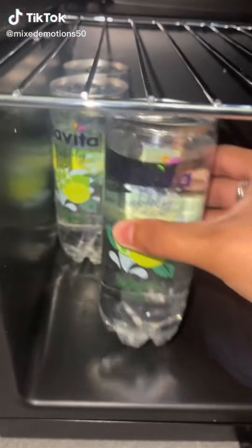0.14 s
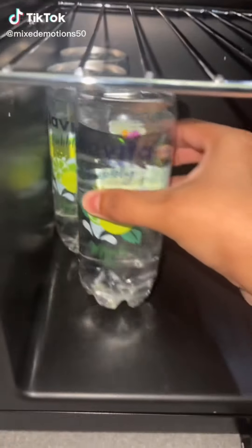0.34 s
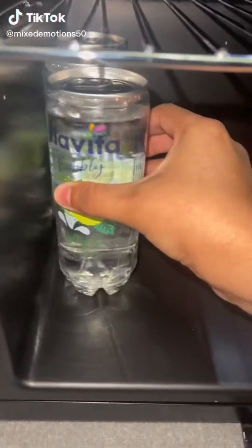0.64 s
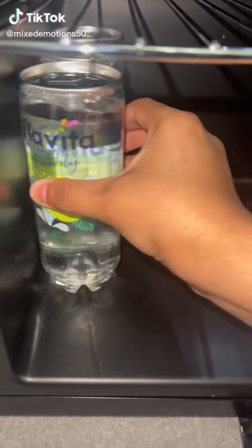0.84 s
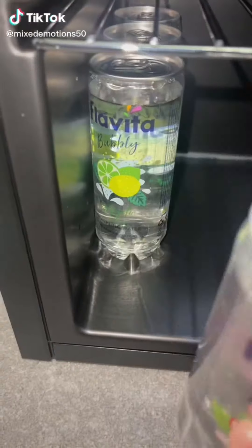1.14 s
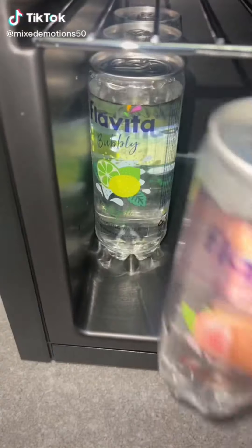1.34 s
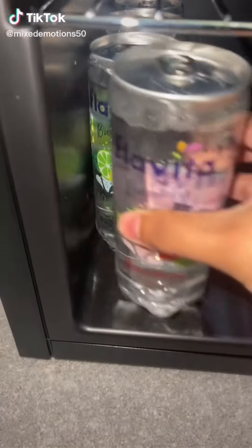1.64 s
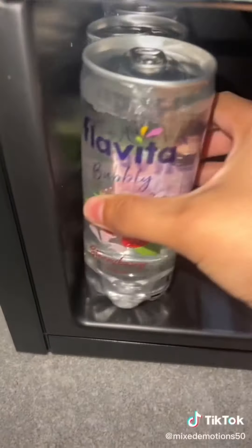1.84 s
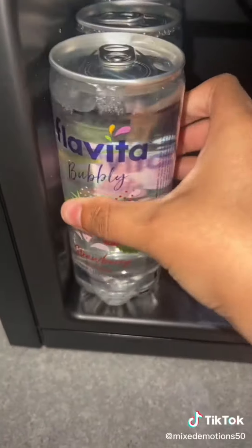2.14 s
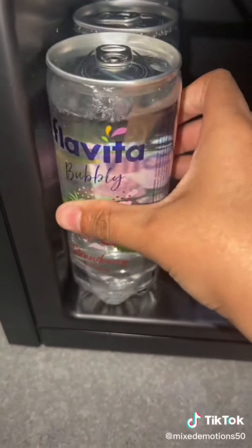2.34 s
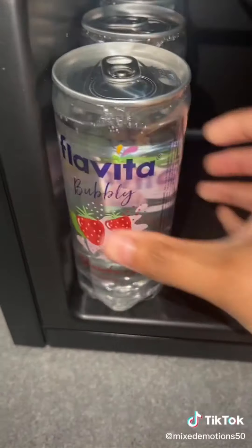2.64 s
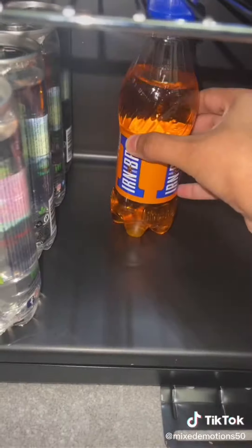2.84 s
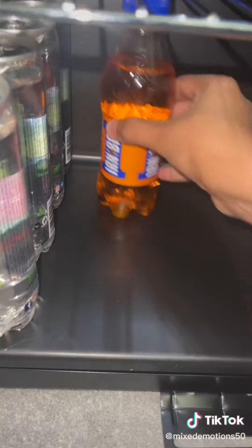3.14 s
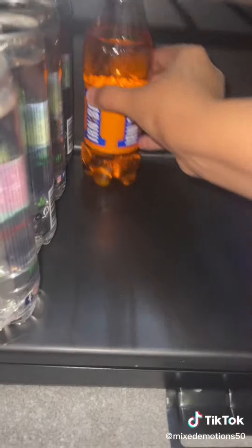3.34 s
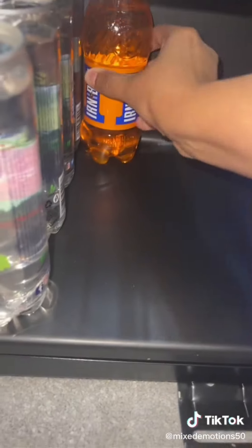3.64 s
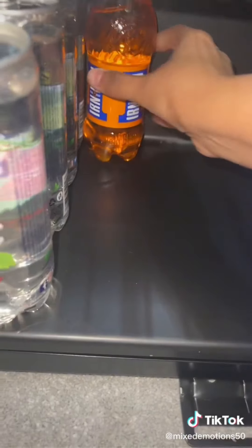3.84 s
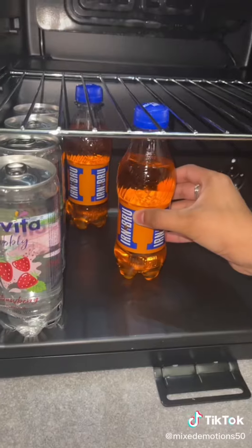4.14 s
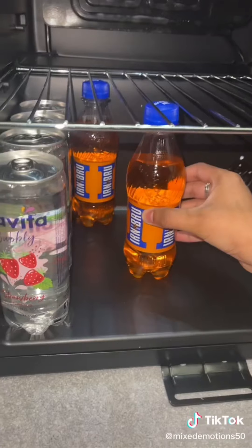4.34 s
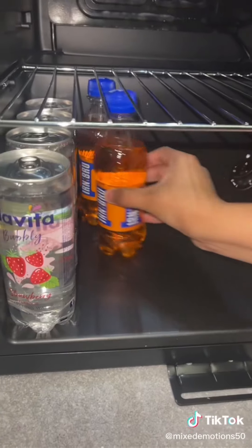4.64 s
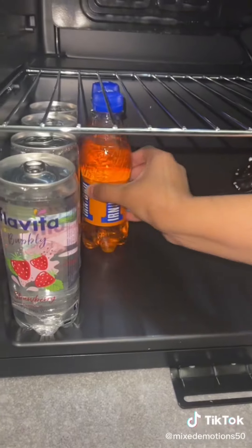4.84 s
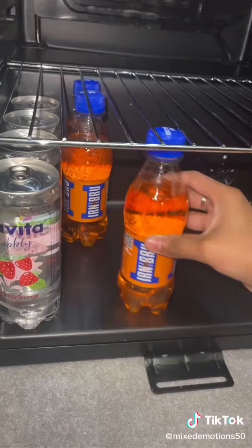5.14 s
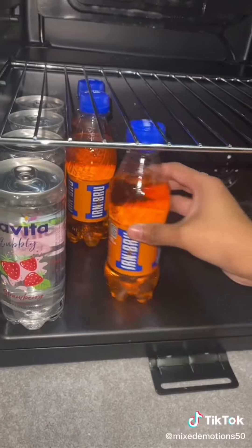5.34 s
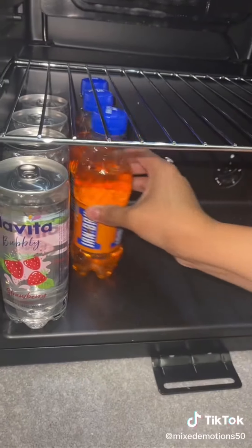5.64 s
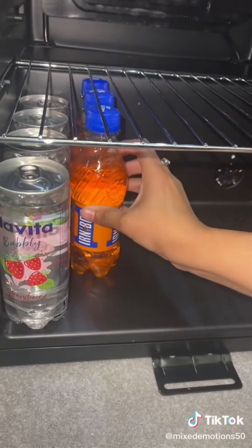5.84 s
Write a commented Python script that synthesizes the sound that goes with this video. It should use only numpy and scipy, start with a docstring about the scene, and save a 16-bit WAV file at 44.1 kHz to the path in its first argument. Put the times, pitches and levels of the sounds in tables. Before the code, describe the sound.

Full plastic drink bottles are set down one after another inside a small running fridge. Each lands with a quick cluster of hard taps and a hollow thump from the thin floor. Between the knocks, fingers softly crinkle the plastic, which gives small clacks and squeaks. A faint fan hiss, low rumble and compressor hum lie underneath. It is heard up close, in five short stretches split by brief silences.

```python
"""Inside a small running fridge, full plastic drink bottles are set down and slid along the thin floor. Each
hard bottle foot taps, the floor panel booms a moment later, and fingers crinkle the plastic, which also clacks
and squeaks. The fan hisses, the cabinet rumbles, the compressor whines, and a mains hum runs underneath. The
sound comes in five short stretches with silence between them."""
import sys
import numpy as np
from scipy import signal
from scipy.fft import rfft, irfft, next_fast_len
from scipy.io import wavfile
from scipy.ndimage import uniform_filter1d, map_coordinates

SR = 44100
rng = np.random.default_rng(int(sys.argv[2]) if len(sys.argv) > 2 else 0)


def unload_wav(signal):
    """Save mono or channel-first audio to the path in sys.argv[1] as 16-bit WAV at rate SR, clipped to [-1, 1]."""
    wavfile.write(
        sys.argv[1],
        SR,
        np.round(np.clip(np.atleast_2d(signal).T, -1, 1) * 32767).astype(np.int16),
    )


N = 264600

# When the sound is on: start_s, end_s, fade_in_s
STRETCHES = [(-1, .9465, .001), (1.134, 2.564, .001), (2.765, 3.766, .11), (3.972, 4.911, .14),
             (5.109, 7, .001)]
# Booms of the floor under a bottle: start_s, level_db, pitch_hz, ring_s (time to fall by 60 dB)
FLOOR_BOOMS = [(0.248, -36, 184, 0.053), (0.267, -25, 198, .08), (0.289, -25.5, 143, 0.017),
               (0.299, -27.5, 70, 0.17), (0.334, -18.5, 164.5, 0.062), (0.358, -25, 144.4, 0.12),
               (0.43, -36.5, 212.6, 0.14), (0.707, -28, 201, 0.03), (0.728, -27, 161.6, 0.043),
               (0.745, -29.5, 82, 0.21), (0.928, -35, 129.4, 0.094), (1.563, -36.5, 109, 0.046),
               (1.585, -31.5, 113, 0.028), (1.7284, -21, 172.4, 0.071), (1.761, -23, 174, 0.1),
               (1.778, -24, 145, 0.065), (1.801, -20.5, 229, .05), (1.853, -36.5, 220.6, 0.24),
               (2.266, -37, 237, 0.044), (2.283, -35, 124, 0.056), (2.309, -37, 151, 0.05),
               (2.391, -32, 83.7, 0.21), (2.489, -46, 100.5, 0.097), (2.537, -34.5, 77.6, 0.074),
               (3.243, -28, 167, 0.049), (3.26, -27.5, 175, 0.053), (3.2969, -20, 134, 0.021),
               (3.328, -36, 155, 0.2), (3.359, -24, 78, 0.018), (3.625, -33, 92, 0.042),
               (4.175, -45.5, 166.7, 0.24), (4.366, -34, 148, 0.087), (4.608, -30, 143, 0.08),
               (4.636, -34, 168, 0.023), (4.651, -21.5, 151, 0.061), (4.657, -19.5, 160, 0.015),
               (4.692, -28, 140.8, 0.088), (4.705, -31, 63, 0.17), (5.154, -42, 150, 0.035),
               (5.375, -47, 167, 0.041), (5.467, -36.5, 203, 0.18), (5.494, -27, 133, 0.088),
               (5.508, -45, 66, .12), (5.572, -38, 91, .052)]


def amp(db):
    """Turns decibels into a gain to multiply by."""
    return 10 ** (np.asarray(db) / 20)


def unit(x):
    """Scales a signal to an average strength (rms) of 1."""
    return x / np.sqrt(np.mean(x ** 2) + 1e-20)


def wobble(rate, size=N):
    """A smooth curve through `rate` random values a second."""
    points = rng.standard_normal(int(size * rate / SR) + 4)
    return map_coordinates(points, [np.arange(size) * rate / SR])


def filtered(x, response):
    """Multiplies each frequency in x by the gain response(hz)."""
    size = next_fast_len(len(x) + 8192)
    return irfft(rfft(x, size) * response(np.fft.rfftfreq(size, 1 / SR)), size)[:len(x)]


def noise(spectrum, size=N):
    """Noise of strength 1, shaped by (pitch_hz, level_db) points."""
    pitch_hz, level_db = np.transpose(spectrum)
    shape = lambda hz: amp(np.interp(np.log(hz + 1), np.log(pitch_hz), level_db))
    return unit(filtered(rng.standard_normal(size), shape))


def fade(t, ring_s, rise_s):
    """A soft rise and a fall of 60 dB every ring_s seconds."""
    return amp(-60 * t / np.maximum(ring_s, .005)) * (1 - np.exp(-t / rise_s)) ** 2


def add(out, start_s, sound):
    """Mixes a sound into out at start_s."""
    part = out[round(start_s * SR):][:len(sound)]
    part += sound[:len(part)]


def patchy(x, depth_db):
    """Makes small patches of pitch and time louder or fainter at random."""
    grid = signal.stft(x, nperseg=512)[2]
    patches = uniform_filter1d(rng.standard_normal(grid.shape), size=5, axis=0)
    patches = unit(uniform_filter1d(patches, size=6, axis=1))
    return unit(signal.istft(grid * amp(depth_db * patches), nperseg=512)[1][:len(x)])


def fan_hiss(stretch):
    """The fan's flickering hiss, with a narrow dip in its treble."""
    # Tone of the hiss: pitch_hz, level_db
    spectrum = [(300, -34.5), (420, -10), (800, -4.5), (1100, -5.5), (1700, -10.5), (3200, -19.5),
                (4750, -11), (5300, -10.5), (5900, -12.5), (6500, -19), (9900, -19), (10600, -28),
                (12800, -32.5), (13300, -23), (15700, -24)]
    # Depth of the dip in each stretch: share (0 to 1)
    dip_depths = [.1, 0.27, .3, 0.95, 1]
    hiss = amp(1.8 * wobble(25)) * patchy(noise(spectrum), depth_db=1.9)
    treble_band = filtered(hiss, lambda hz: np.exp(-((hz - 5700) / 510) ** 2))
    return hiss - np.array(dip_depths)[stretch] * treble_band


def cabinet_rumble(running_db):
    """The cabinet rumbles unevenly and shudders on after each boom."""
    # Tone of the rumble: pitch_hz, level_db
    spectrum = [(15, -49.5), (25, -18), (54, 4), (91, -11.5), (128, -3.5), (229, -15), (257, -12.5),
                (312, -14), (467, -22.5), (530, -31), (700, -28), (910, -55), (1540, -120)]
    shudder_power, t = np.zeros(N), np.arange(SR) / SR
    for start_s, level_db, *_ in FLOOR_BOOMS:
        add(shudder_power, start_s, (amp(level_db - 14) * fade(t, ring_s=.4, rise_s=.0036)) ** 2)
    rumble = unit(amp(2.7 * wobble(22)) * noise(spectrum))
    return np.sqrt(amp(running_db) ** 2 + shudder_power) * rumble


def compressor_whine():
    """Noise from the compressor's shell, plus tones tied to its turning shaft."""
    # Tone of the shell noise: pitch_hz, level_db
    shell_spectrum = [(1200, -32.5), (1800, -2), (2250, -2.5), (2500, -2.5), (2800, 0.5), (3200, -4),
                      (3600, -1), (4100, -15.5), (4750, -8), (6000, -20.5)]
    # Shaft tones: multiple (of the shaft speed), level_db (against the shell noise)
    shaft_tones = [(45, -18), (46, -6), (47, -15), (48, -12), (49, -29), (51, -28.5), (52, -9.5),
                   (56, -23.5), (57, -5), (58, -20)]
    shaft_hz = 49.04 + .015 * wobble(3)
    angle = 2 * np.pi * np.cumsum(shaft_hz) / SR
    stroke = 1 + .19 * np.cos(angle)  # the piston shakes the shell once a turn
    whine = stroke * noise(shell_spectrum)
    for multiple, level_db in shaft_tones:
        whine += amp(level_db + .43 * wobble(12)) * np.sin(multiple * angle + rng.uniform(0, 2 * np.pi))
    return whine


def hum_and_drones(hum_db, fuzzy_db, drone_db, hum_hz=99.5):
    """A fluttering mains hum, a fuzzy tone near eleven times the shaft speed, and a low drone."""
    t = np.arange(N) / SR
    hum = amp(2.5 * wobble(25)) * np.sin(2 * np.pi * hum_hz * t + .5 * wobble(15))
    fuzzy = noise([(440, -40), (520, -14), (539, 0), (560, -14), (660, -40)])
    drone = noise([(110, -29), (150, 2.5), (185, 4), (215, -3), (300, -34)])
    return amp(hum_db) * hum + amp(fuzzy_db) * fuzzy + amp(drone_db) * drone


def running_fridge():
    """Fan, cabinet, compressor and mains hum together; the background steps up in level after the first knock
    in each stretch."""
    # Loudness of the hiss: time_s, level_db
    loudness = [(0, -71.5), (.23, -71), (.3, -61.5), (.95, -60.5), (1.13, -75.5), (1.52, -71.5),
                (1.59, -65.5), (1.7, -70), (1.76, -63.5), (2.57, -61.5), (2.76, -70), (3.22, -66.5),
                (3.3, -64.5), (3.77, -61), (3.97, -71.5), (4.58, -64), (4.7, -60.5), (4.93, -62.5),
                (5.1, -73), (5.44, -70.5), (5.52, -64.5), (6, -64.5)]
    # Levels against a hiss at middle_db, a row per stretch: rumble_db, whine_db, hum_db, fuzzy_db, drone_db
    balances = [(13.5, -1, 15.5, -8.5, 2.5), (14.5, 2, 16.5, -7, 1.5), (12.5, 0, 13.5, -4.5, 1.5),
                (11, -7.5, 12.5, -4, 8), (11, -9, 12, -3, 8)]
    middle_db = -62
    growth = np.array([1.52, 1.06, 1.1, 1.1, 1])[:, None]  # dB each of the five gains per dB of hiss
    t = np.arange(N) / SR
    hiss_db = np.interp(t, *np.transpose(loudness))
    stretch = np.searchsorted([end_s + .1 for _, end_s, _ in STRETCHES], t)
    levels_db = middle_db + np.transpose(balances)[:, stretch] + growth * (hiss_db - middle_db)
    rumble_db, whine_db, hum_db, fuzzy_db, drone_db = levels_db
    return (amp(hiss_db) * fan_hiss(stretch) + cabinet_rumble(rumble_db)
            + amp(whine_db) * compressor_whine() + hum_and_drones(hum_db, fuzzy_db, drone_db))


def plastic_notes():
    """Each clack or squeak is one dying tone, roughened by an uneven grip."""
    # Hollow notes from the plastic: start_s, level_db, pitch_hz, ring_s
    notes = [(.085, -57.5, 2110, .14), (.745, -43, 2120, 0.11), (1.793, -29, 2820, 0.035),
             (3.019, -56, 2856, 0.41), (3.29, -28, 2750, 0.034), (3.291, -33, 3935, .025),
             (3.432, -47.5, 2037, 0.22), (3.62, -41.5, 554, 0.16), (3.68, -45.5, 540, 0.22),
             (4.298, -42, 737, 0.079), (4.307, -54, 1236, 0.3), (4.315, -54.5, 1730, 0.26),
             (4.318, -36.5, 626, .078), (4.5, -51.5, 545, .4), (4.59, -49.5, 1800, 0.029),
             (4.602, -40, 810, .07), (4.655, -37.5, 833, 0.16), (4.646, -34.5, 1344, .05),
             (4.821, -57.5, 1117, 0.13), (4.869, -53, 1120, 0.12), (5.476, -45, 696, 0.13),
             (5.477, -38, 502, 0.082), (5.5, -43, 615, 0.12)]
    out, t = np.zeros(N), np.arange(SR // 4) / SR
    for start_s, level_db, pitch_hz, ring_s in notes:
        grip_db = 3.5 * wobble(150, len(t))
        slip = 1.1 * wobble(140, len(t))
        tone = amp(level_db + grip_db) * np.sin(2 * np.pi * pitch_hz * t + slip)
        add(out, start_s, tone * fade(t, ring_s, rise_s=.039 * ring_s))
    return out


def bottle_taps():
    """A hard foot grinds down for an instant: grit rings the bottle wall and makes a bright crack."""
    # Feet meeting the floor: start_s, level_db, crack_db (added to level_db), ring_s, pitch_hz
    taps = [(0.244, -47, -8.5, 0.045, 673), (0.264, -25.5, -15.5, 0.028, 523),
            (0.329, -25.5, -12, 0.047, 683), (0.349, -29.5, -10, 0.025, 506), (0.706, -45, -4, .045, 678),
            (0.721, -37.5, -6, 0.035, 724), (1.545, -59, -5.5, 0.23, 497), (1.581, -44.5, -18, 0.047, 500),
            (1.724, -31, -8.5, 0.063, 774), (1.761, -45.5, -6, 0.17, 695), (1.795, -32, -5, 0.032, 496),
            (2.305, -52.5, -6.5, 0.078, 770), (3.239, -32, -9, 0.057, 975), (3.294, -26, -10.5, 0.062, 736),
            (3.603, -51.5, -9, 0.089, 592), (3.632, -32, -14.5, 0.017, 573),
            (4.303, -40.5, -43, 0.021, 732), (4.359, -42, -17.5, 0.037, 485), (4.602, -48, -8, 0.27, 716),
            (4.639, -30, -19.5, 0.037, 530), (4.647, -34, -11, 0.071, 730), (4.667, -38.5, -32, 0.028, 813),
            (5.151, -48.5, -41, 0.04, 494), (5.461, -53.5, -7, .068, 608), (5.48, -41, -10, 0.048, 525)]
    # Where the bottle wall rings: pitch_hz, width_hz, level_db
    wall_tones = [(426, 28, 5), (537, 56, 4.5), (708, 82, 8.5), (745.5, 76, 11), (962, 140, 1),
                  (1058, 110, 1.5), (1358, 90, -2.5), (1626, 240, -5)]
    # Tone of the crack: pitch_hz, level_db
    crack_spectrum = [(1200, -30), (1900, -8), (2400, -6), (2800, 0.5), (3200, -4), (3900, -7.5),
                      (4300, -7.5), (4800, -11), (5400, -15), (6500, -38.5)]
    # Tone of the high fizz on top: pitch_hz, level_db
    fizz_spectrum = [(4500, -24.5), (6000, 4.5), (8000, -4), (10000, -3), (12000, -23.5), (15700, -12.5)]
    out, t = np.zeros(N), np.arange(SR // 4) / SR
    for start_s, level_db, crack_db, ring_s, pitch_hz in taps:
        def wall(hz):
            """The wall's response, favouring tones near this tap's pitch."""
            return sum((-1) ** k * amp(db - 8.7 * np.log(tone_hz / pitch_hz) ** 2)
                       * 1j * hz * width_hz / (tone_hz ** 2 - hz ** 2 + 1j * hz * width_hz)
                       for k, (tone_hz, width_hz, db) in enumerate(wall_tones))
        ring = amp(level_db + 2) * unit(filtered(rng.standard_normal(len(t)), wall))
        bright_db = level_db + crack_db
        crack = amp(bright_db - 3) * noise(crack_spectrum, len(t))
        crack += amp(.49 * bright_db - 38.5) * noise(fizz_spectrum, len(t))
        # The second fade on each line is the small cabinet's weak tail.
        ring *= fade(t, ring_s, .0014) + .15 * fade(t, .26, .012)
        crack *= fade(t, 1.66 * ring_s, .0003) + .25 * fade(t, .11, .00047)
        add(out, start_s - .0015, ring + crack)
    return out


def floor_booms():
    """The loaded floor panel swings a few times; its own nearby tones ring on weakly."""
    # The panel's own tones: pitch_hz, level_db, ring_factor
    panel_tones = [(67.8, -2, 4.9), (103.7, -5.5, 3.4), (133, -2.5, 2.2), (150, 2.5, 3.6),
                   (189.7, 13.5, 0.79), (225, 6.5, 2), (281.5, 5.5, 2.4), (283, -13, 0.78)]
    tone_hz, tone_db, ring_factor = np.transpose(panel_tones)[..., None]
    out, t = np.zeros(N), np.arange(SR // 2) / SR
    rocking = amp(-8.5) * fade(t, .4, .008) * np.sin(2 * np.pi * 71 * t)  # the cabinet on its feet
    for start_s, level_db, pitch_hz, ring_s in FLOOR_BOOMS:
        swing = fade(t, ring_s, .0034) * np.sin(2 * np.pi * pitch_hz * t)
        swing /= np.abs(swing).max()
        shares = amp(tone_db - 15 - 20 * np.log(tone_hz / pitch_hz) ** 2)
        ringing = (shares * fade(t, .1 * ring_factor, .0024) * np.sin(2 * np.pi * tone_hz * t)).sum(0)
        add(out, start_s + .0029, amp(level_db) * (swing + ringing + rocking))
    return out


def finger_crinkles():
    """Fingers crinkle the plastic: soft puffs of noise with some fizz on top."""
    # Crinkles: start_s, level_db, pitch_hz, fizz_db (added to level_db)
    crinkles = [(0.602, -45, 5160, -20.5), (0.773, -44, 4550, -13), (0.8936, -47, 5470, -28),
                (1.9088, -55.5, 3375, -13.5), (1.951, -49.5, 3440, -7), (2.0703, -48, 3900, -26),
                (2.134, -44, 4050, -12), (2.2399, -41.5, 3800, -18), (2.3151, -37, 4970, -24.5),
                (2.4401, -40.5, 4570, -12), (2.9442, -49, 3560, -15.5), (4.112, -58.5, 4520, -11),
                (4.2172, -55.5, 3660, -13), (4.5088, -41.5, 3900, -14.5), (4.818, -43.5, 7900, -22),
                (4.832, -43, 4360, -6.5), (5.5741, -51, 3800, -20), (5.6197, -50, 4000, -5),
                (5.7287, -52, 4640, -6), (5.8916, -50.5, 4930, -4.5)]
    out, t = np.zeros(N), np.arange(SR // 4) / SR
    for start_s, level_db, hz, fizz_db in crinkles:
        puff = noise([(hz / 1.7, -30), (hz / 1.25, -4), (hz, 0), (hz * 1.3, -3), (hz * 1.5, -30)], len(t))
        fizz = amp(fizz_db + 4) * noise([(6000, -12), (7500, 6.5), (10500, 2.5), (15000, -11.5)], len(t))
        add(out, start_s - .003, amp(level_db - 3.5) * (puff + fizz) * fade(t, ring_s=.045, rise_s=.0032))
    return out


def scene():
    """All the sounds together in one channel."""
    return (running_fridge() + plastic_notes() + bottle_taps() + floor_booms() + finger_crinkles())[None]


def record(dry):
    """The microphone drops deep bass, each stretch stops sharply, and the highest treble is cut."""
    bass_hz, top_hz = 45, 15750
    t, gain = np.arange(N) / SR, np.zeros(N)
    for start_s, end_s, fade_in_s in STRETCHES:
        gain += np.clip((t - start_s) / fade_in_s, 0, 1) ** 1.5 * np.clip((end_s - t) / .001, 0, 1)
        gain += (t > end_s) * amp(-18 - 740 * np.abs(t - end_s))  # a faint tail that dies fast
    heard = filtered(dry[0], lambda hz: (1j * hz / (bass_hz + 1j * hz)) ** 3)
    return filtered(heard * gain, lambda hz: hz < top_hz)[None]


dry = scene()
out = record(dry)
unload_wav(out)
```